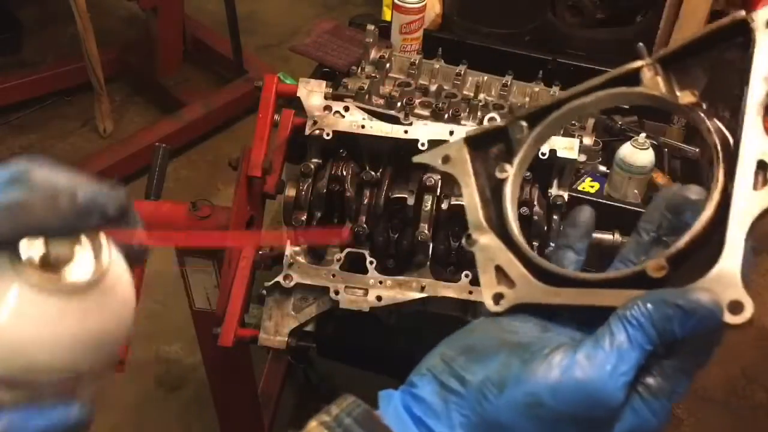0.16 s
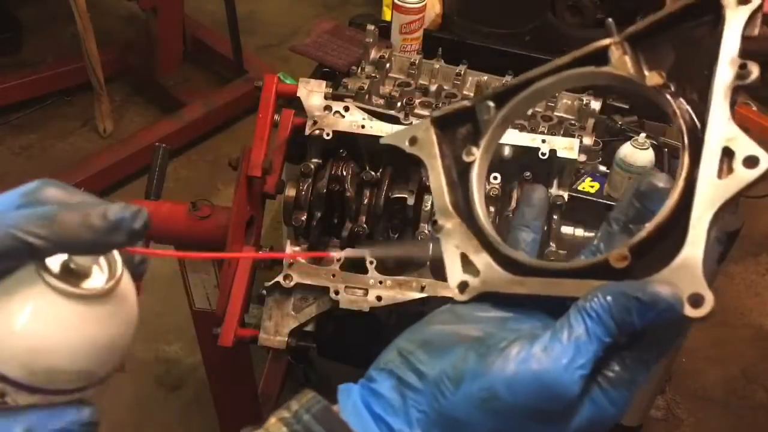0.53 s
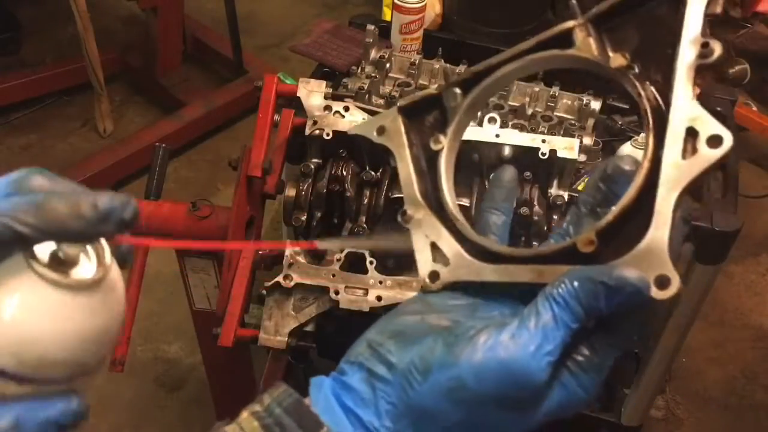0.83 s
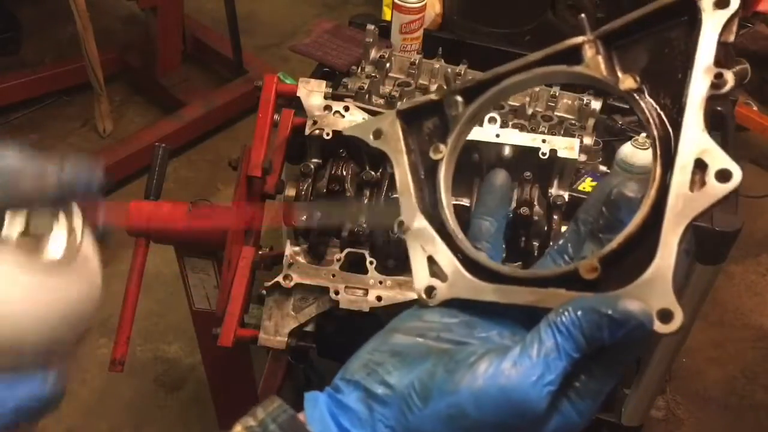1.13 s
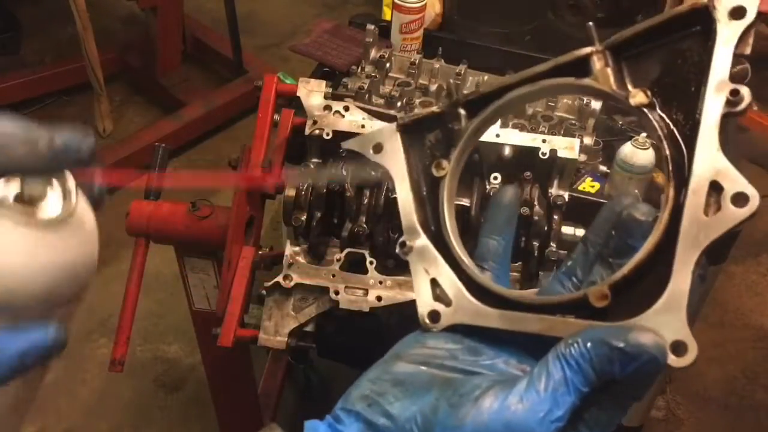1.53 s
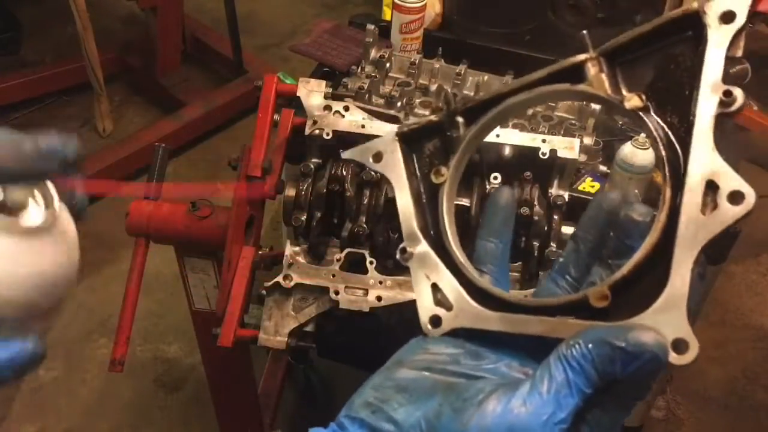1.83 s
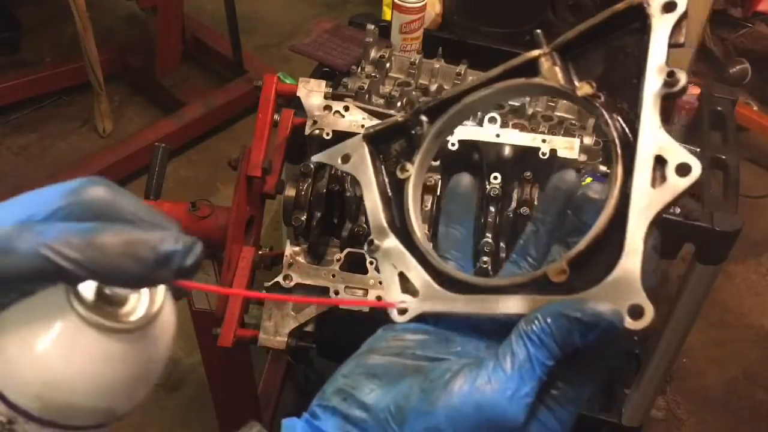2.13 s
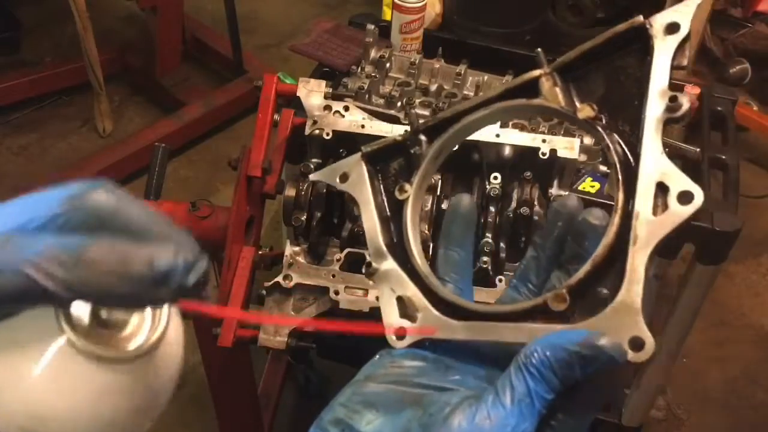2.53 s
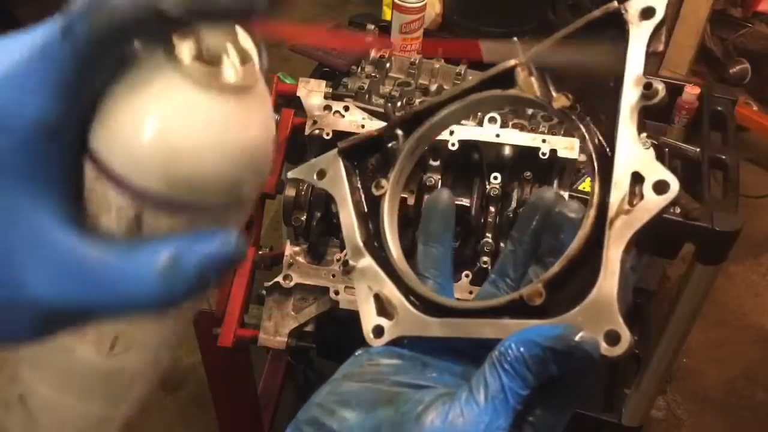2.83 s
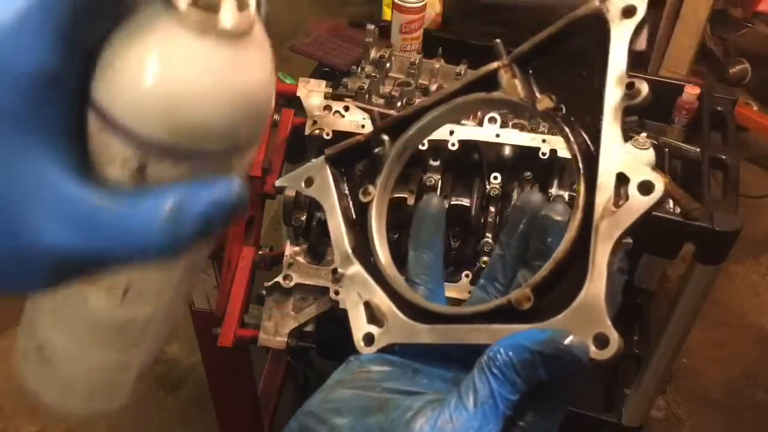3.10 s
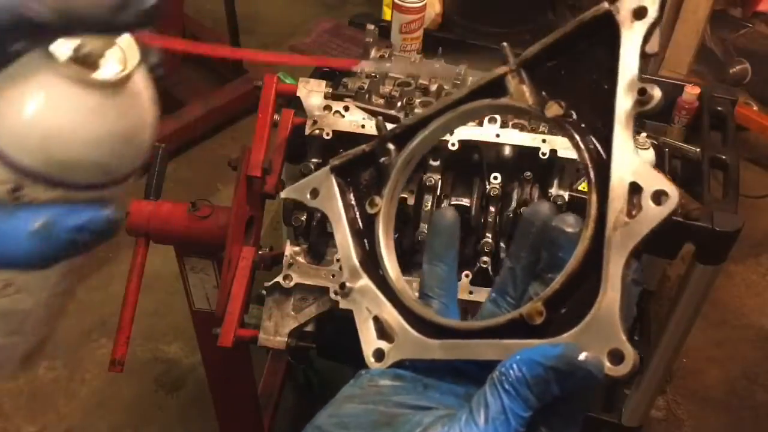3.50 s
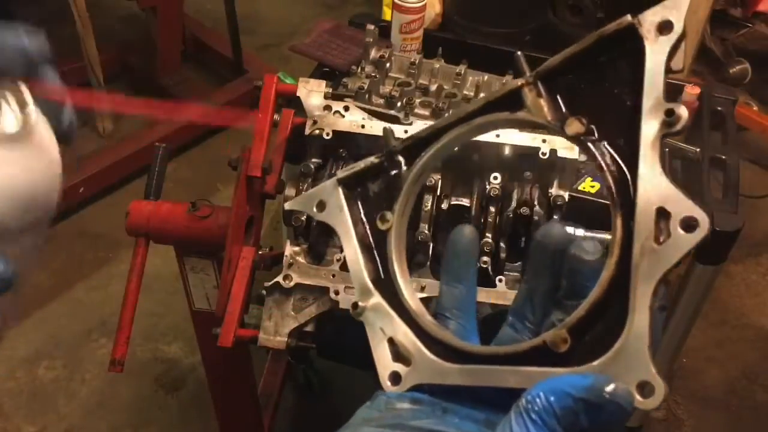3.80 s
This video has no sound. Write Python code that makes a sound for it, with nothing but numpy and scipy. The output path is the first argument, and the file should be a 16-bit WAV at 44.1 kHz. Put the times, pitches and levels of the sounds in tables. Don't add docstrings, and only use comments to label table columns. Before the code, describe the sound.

Aerosol spray, close and practically mono, over low workshop rumble. Bright whistling hisses with duller splashing on metal run at 0.2-0.5, 0.55-0.85, 0.95-1.2 and 1.2-1.65 seconds. A louder, more hollow-sounding sweep lasts 1.8-2.4, then the longest spray 2.5-3.65, starting with crackly spits. Each cuts off abruptly. Tiny ticks and glove rustles fill gaps; a soft low knock and rubbing follow from 3.8.

```python
import sys
import numpy as np
from scipy import signal
from scipy.fft import rfft, irfft
from scipy.io import wavfile
from scipy.ndimage import uniform_filter1d, map_coordinates

SR = 44100
rng = np.random.default_rng(int(sys.argv[2]) if len(sys.argv) > 2 else 0)


def nominal_scale(level):
    x = np.asarray(level, float) / 20
    return 10 ** x


def put_to_file(sound):
    columns = np.atleast_2d(sound).T
    safe = np.clip(columns, -1, 1)
    whole_steps = np.round(safe * 32767)
    wavfile.write(sys.argv[1], SR, whole_steps.astype(np.int16))


N = 174195
T_S = np.arange(N) / SR

# open t/s, shut t/s, first spit re full flow level/dB, rise t/s
PRESSES = [
    (0.183, 0.473, -12, 0.061),
    (0.556, 0.848, -10, 0.059),
    (.939, 1.193, -13.5, 0.074),
    (1.204, 1.671, -9.5, 0.12),
    (1.782, 2.408, -18, 0.076),
    (2.486, 3.667, -12, 0.038),
]
# t/s, level/dB, lower whistle f/Hz, upper whistle f/Hz, top air level/dB
JET_DABS = [
    [(0.25, -36, 9070, 13800, -1), (0.314, -32.5, 8200, 13400, -1), (0.4, -34, 8800, 13000, -1),
     (0.46, -36.5, 9300, 12800, -1)],
    [(0.61, -37.5, 9200, 12900, 0.5), (0.672, -32.5, 8700, 12700, .5), (.76, -36, 9400, 12600, .5),
     (0.84, -38.5, 10200, 12500, .5)],
    [(1.0, -34, 9500, 12500, 1.9), (1.11, -34.5, 9600, 12200, 2.7), (1.18, -37, 9800, 12200, 3.2)],
    [(1.26, -33, 9600, 12300, 4.4), (1.34, -34.5, 9650, 11900, 4.8), (1.44, -38.5, 9400, 11900, 6.8),
     (1.564, -31.5, 9500, 12500, 3.3), (1.66, -38.5, 9900, 12400, 4.5)],
]
JET_SWEEPS = [
    [(1.84, -30.5, 9000, 12600, -3), (1.892, -25, 9000, 12400, -1), (1.93, -25.5, 9100, 12400, -4),
     (2.024, -29.5, 8900, 13300, -1), (2.326, -29, 9100, 12600, 2), (2.375, -31, 9250, 12600, .6),
     (2.41, -36.5, 9600, 12400, -1)],
    [(2.54, -37, 9200, 13400, .6), (2.62, -31.5, 8640, 13300, .6), (3.048, -37, 9200, 14000, 1.5),
     (3.206, -35, 8600, 13600, 1.3), (3.44, -36.5, 9600, 13000, .6), (3.546, -36.5, 10000, 12300, 6.9),
     (3.66, -37, 9700, 12400, 4.3)],
]
# t/s, splash level/dB, hollow f/Hz, hollow peak level/dB
DAB_HITS = [
    [(0.25, -46.5, 1150, 2), (0.424, -40.5, 906, 0), (0.46, -47.5, 1270, 0)],
    [(0.61, -45, 1220, 1.5), (0.736, -41.5, 910, 0.5), (0.84, -47.5, 1060, -0.5)],
    [(1.0, -43.5, 824, 2), (1.12, -43, 1100, 1.5), (1.18, -43.5, 836, 3.5)],
    [(1.26, -40.5, 1100, 3), (1.592, -42.5, 1320, 2), (1.66, -46, 1180, 3.5)],
]
SWEEP_HITS = [
    [(1.84, -39.5, 1050, 5.4), (1.88, -39.5, 1880, 8), (1.98, -42, 2240, 10.6), (2.05, -43, 1900, 1.6),
     (2.31, -41, 1950, 5.9), (2.36, -36.5, 2250, 6.2), (2.405, -44, 1500, 1.3)],
    [(2.54, -47.5, 1450, 5.1), (2.64, -40, 2700, .3), (2.72, -42, 2800, .3), (2.9, -43, 2800, 0.28),
     (3.17, -44.5, 2820, .3), (3.22, -44, 1340, 0.41), (3.45, -42.5, 1340, 0.31), (3.56, -38.5, 1540, 7.1),
     (3.66, -43.5, 1640, 4.5)],
]
# f/Hz, level/dB per Hz
JET_SPECTRUM = [(1500, -61), (3000, -20), (5000, -6), (7000, -6.5), (10500, -6.5), (14000, -7.5),
                (15800, -7.5)]
# f/Hz, level/dB per Hz
SPLASH_SPECTRUM = [(120, -20.5), (250, -2), (600, -4), (1500, -5), (3500, -4), (7000, -16.5), (15000, -25)]
# f/Hz, width f/Hz, level/dB
FRAME_RINGS = [(585, 90, 4), (1100, 110, 3)]
# t/s, frame lag t/ms, signed frame share/1, block lag t/ms
ECHOES = [(.2, .385, -.3, .44), (1.68, .38, -.25, .41), (1.8, .44, .1, .45), (2.0, .44, .12, .46),
          (2.13, .43, .2, .56), (2.27, .45, .15, .45), (2.4, .45, .15, .44), (2.55, .43, -.3, .46),
          (2.66, .53, -.2, .47), (2.88, .53, -.15, .68), (3.15, .53, -.15, .64), (3.21, .425, -.45, .465),
          (3.45, .405, -.45, .425), (3.5, .315, -.3, .425), (3.67, .315, -.3, .41)]
# t/s, f/Hz, width f/Hz, level/dB
SLOT = [(.2, 2880, 380, 1), (.46, 3020, 378, -7), (.6, 3300, 450, -1), (.85, 3200, 450, -6),
        (.97, 2430, 250, -1.5), (1.4, 2320, 300, -4), (1.66, 2200, 300, 0.9), (1.8, 3430, 600, -0.5),
        (2.0, 3430, 600, 2), (2.3, 3340, 500, -1.5), (2.42, 3280, 500, -6), (2.5, 5000, 500, 0),
        (2.62, 5030, 500, -9), (2.63, 2800, 170, -9), (2.68, 2780, 170, 4.5), (2.8, 2740, 170, 4),
        (2.9, 2800, 150, -1.5), (3.17, 2840, 150, 5.5), (3.19, 2850, 150, -4), (3.2, 4600, 200, -7),
        (3.44, 4950, 200, 0), (3.46, 5300, 450, 1.5), (3.67, 5270, 450, 3)]
# t/s, peak level/dB, f/Hz
SPITS = [(0.1764, -47, 4280), (0.1845, -40, 4300), (0.1984, -32, 6660), (0.5646, -34, 6410),
         (0.9428, -39, 4200), (1.7918, -30.5, 6510), (2.4914, -33, 8780), (2.4962, -27, 8900),
         (2.5027, -29, 9000), (2.5064, -33, 8370), (2.5104, -30, 7080), (2.5207, -26, 9200)]
# t/s, peak level/dB, f/Hz, t60 t/s
TICKS = [(.013, -59, 2260, .03), (.128, -64.5, 13000, .01), (.137, -61, 12500, .012), (.488, -57, 950, .03),
         (.531, -58, 850, .04), (3.8, -52, 3120, .02), (.06, -61, 2180, .03), (.152, -63, 9000, .02),
         (.156, -53, 940, 0.026), (1.797, -39, 5430, .02), (2.434, -33, 6600, 0.0064),
         (2.44, -57, 1880, 0.28), (2.492, -42.5, 1800, 0.016), (3.8, -54, 5200, 0.027),
         (3.805, -52, 3960, 0.11), (3.87, -54, 2860, 0.04), (3.798, -42.5, 85.5, 0.057)]
# t/s, length t/s, level/dB, brightness dB/octave
RUSTLES = [
    (0, 0.031, -67, 6.5),
    (0.483, .07, -59, -5),
    (2.427, .06, -54, -2.5),
    (3.674, 0.11, -60, 0.5),
    (3.792, 0.0076, -53, .3),
    (3.811, 0.075, -58, -1),
    (3.882, .2, -53.5, -0.6),
]
# f/Hz, level/dB per Hz
GLOVE_SPECTRUM = [(300, -12), (600, 0), (1100, -5), (2000, 7.5), (4000, 3.5), (9000, 4.5), (12500, 1),
                  (15800, -8)]
# f/Hz, t60 t/s
ROOM_T60 = [(300, 0.55), (3000, 0.42), (12000, 0.15)]
# f/Hz, level/dB per Hz
SHOP_SPECTRUM = [(45, -1.5), (90, -7), (170, -20.5), (365, -24), (500, -37), (2200, -34), (3000, -38.5),
                 (15800, -38)]
# t/s, low edge f/Hz, high edge f/Hz, level/dB
STEREO_SLIPS = [
    (2.208, 5160, 8400, -40),
    (2.697, 8100, 9600, -44),
    (3.208, 9400, 12460, -47),
]


def jet():
    def colour(f_hz, t_s):
        level_db, low_hz, high_hz, air_db = curves(JET_DABS + JET_SWEEPS, t_s)
        air = nominal_scale(along(JET_SPECTRUM, f_hz) + air_db * np.clip((f_hz - 11000) / 4500, 0, 1))
        low = bump(f_hz, low_hz, 0.15 * low_hz, 6)
        high = bump(f_hz, high_hz, 0.074 * high_hz, 8 - 0.33 * (level_db + 33))
        return air * echoes(f_hz, t_s) * slot(f_hz, t_s) * straw_fill(f_hz, t_s) * low * high

    level_db = curves(JET_DABS + JET_SWEEPS, T_S)[0] + 1.14 * wobble(30.16)
    return nominal_scale(level_db) * shaped(droplets(1.1, 900), colour, patchy_db=1.1)


def straw_fill(f_hz, t_s):
    fill_s, dull_db = 0.095, -4
    since_open_s = [np.where(t_s < on_s - 0.02, 9, t_s - on_s) for on_s, *_ in PRESSES]
    filled = np.min(since_open_s, 0) / fill_s
    climb_hz = np.interp(filled, [0, 1], [4300, 15000])
    filling = np.clip(6 - 5 * filled, 0, 1)
    dulling = nominal_scale(dull_db * filling * np.clip((f_hz - climb_hz) / 3000, 0, 1))
    return bump(f_hz, climb_hz, 700, 7 * filling) * dulling


def splash():
    def colour(f_hz, t_s):
        _, hollow_hz, hollow_db = curves(DAB_HITS + SWEEP_HITS, t_s)
        hollow = bump(f_hz, hollow_hz, 0.16 * hollow_hz, hollow_db)
        bass_cut_db = 1.18 * hollow_db + 6.6 * np.log2(hollow_hz / 1100) * (t_s < 2.45)
        bass = nominal_scale(-bass_cut_db / (1 + (f_hz / 450) ** 4))
        frame = np.prod([bump(f_hz, *ring) for ring in FRAME_RINGS], 0)
        return nominal_scale(along(SPLASH_SPECTRUM, f_hz)) * hollow * bass * echoes(f_hz, t_s) * slot(f_hz, t_s) * frame

    level_db = curves(DAB_HITS + SWEEP_HITS, T_S)[0] + 1.13 + 0.65 * wobble(24.9)
    return nominal_scale(level_db) * shaped(droplets(0.73, 300), colour, patchy_db=1.2)


def valve_flow():
    open_s, shut_db_per_s, sputter_db = 0.006, 1086, 2.0
    gains_db = []
    for on_s, off_s, spit_db, rise_s in PRESSES:
        rise_db = spit_db * np.clip(1 - (T_S - on_s) / rise_s, 0, 1)
        crack_db = -14 * np.clip(1 - (T_S - on_s) / open_s, 0, 1)
        fall_db = -shut_db_per_s * np.clip(T_S - off_s, 0, 1)
        gains_db.append(np.where(T_S < on_s, -200, rise_db + crack_db + fall_db))
    gain_db = np.max(gains_db, 0)
    return nominal_scale(gain_db + sputter_db * np.clip(-gain_db / 12, 0, 1) * wobble(260))


def droplets(grain_db, rate_hz):
    return rng.standard_normal(N) * nominal_scale(grain_db * wobble(rate_hz))


def echoes(f_hz, t_s):
    frame_ms, share, block_ms = curves([ECHOES], t_s)
    dabbing = t_s < 1.75
    frame_gain = 0.75 * share * np.clip(f_hz / np.where(dabbing, 2400, 4000), 0, 1) / (1 + (f_hz / 8000) ** 4)
    frame = 1 + frame_gain * np.exp(-2j * np.pi * f_hz * frame_ms / 1000)
    sway = np.where(dabbing, 0.6, 1 + 0.35 * np.sin(19 * t_s + f_hz / 1900))
    block_gain = 0.28 * sway * np.clip(f_hz / 4000 - 1.25, 0, 1)
    jitter_ms = 0.012 * wobble(5)[np.minimum(t_s * SR, N - 1).astype(int)]
    block = 1 + block_gain * np.exp(-2j * np.pi * f_hz * (block_ms + jitter_ms) / 1000)
    return frame * block


def slot(f_hz, t_s):
    return bump(f_hz, *curves([SLOT], t_s))


def ticks():
    out, t_s = np.zeros(N + SR), T_S[:SR // 5]
    spits = [(start_s, db - 3.5, f_hz, 0.005) for start_s, db, f_hz in SPITS]
    for start_s, db, f_hz, t60_s in TICKS + spits:
        ring = nominal_scale(-60 * t_s / t60_s) * np.sin(2 * np.pi * f_hz * t_s)
        crack = 0.35 * nominal_scale(-60 * t_s / 0.006) * rng.standard_normal(len(t_s))
        out[round(start_s * SR):][:len(t_s)] += nominal_scale(db) * (ring + crack)
    return out[:N]


def gloves():
    strokes = np.zeros(N)
    for start_s, length_s, db, _ in RUSTLES:
        attack = np.clip((T_S - start_s) / 0.008, 0, 1)
        strokes += nominal_scale(db) * attack * nominal_scale(-300 * np.clip(T_S - start_s - length_s, 0, 9))
    starts_s, *_, tilt_db = np.transpose(RUSTLES)

    def colour(f_hz, t_s):
        stroke = np.searchsorted(starts_s, t_s + 0.01) - 1
        return nominal_scale(along(GLOVE_SPECTRUM, f_hz) + tilt_db[stroke] * np.log2((f_hz + 300) / 2500))

    return strokes * nominal_scale(0.8 * wobble(25)) * shaped(droplets(2.5, 400), colour, patchy_db=1.5)


def room(x):
    f_hz, t_s, z = signal.stft(rng.standard_normal(SR // 2), SR, nperseg=256)
    decay = nominal_scale(-60 * t_s / along(ROOM_T60, f_hz)[:, None])
    tail = signal.istft(z * decay, SR, nperseg=256)[1]
    return signal.fftconvolve(x, tail / np.linalg.norm(tail))[:N]


def shop():
    def colour(f_hz):
        return nominal_scale(along(SHOP_SPECTRUM, f_hz) - 100 * np.clip(44 / (f_hz + 1) - 1, 0, 3))

    return nominal_scale(-55 + 0.77 * wobble(12)) * unit(filtered(rng.standard_normal(N), colour))


def unit(x):
    return x / np.sqrt(np.mean(np.abs(x) ** 2) + 1e-20)


def along(points, f_hz):
    knots_hz, values = np.transpose(points)
    return np.interp(np.log(f_hz + 1), np.log(knots_hz + 1), values)


def curves(tables, t_s):
    knots_s, *columns = np.concatenate(tables).T
    return [np.interp(t_s, knots_s, column) for column in columns]


def wobble(rate_hz):
    return map_coordinates(rng.standard_normal(int(N * rate_hz / SR) + 4), [T_S * rate_hz])


def bump(f_hz, centre_hz, width_hz, db):
    return 1 + (nominal_scale(db) - 1) / (1 + ((f_hz - centre_hz) / width_hz) ** 2)


def shaped(x, gain, patchy_db):
    f_hz, t_s, z = signal.stft(x, SR, nperseg=512, noverlap=384)
    field = uniform_filter1d(rng.standard_normal(z.shape), size=7, axis=0)
    field = uniform_filter1d(field, size=30, axis=1)
    z = z * gain(f_hz[:, None], t_s) * nominal_scale(patchy_db * unit(field))
    return unit(signal.istft(z, nperseg=512, noverlap=384)[1][:N])


def filtered(x, gain):
    return irfft(rfft(x) * gain(np.fft.rfftfreq(N, 1 / SR)), N)


def scene():
    near = valve_flow() * (jet() + splash()) + ticks()
    return np.tile(near + nominal_scale(-19) * room(near) + gloves() + shop(), (2, 1))


def low_pass(x):
    return signal.sosfilt(signal.butter(12, 16370, fs=SR, output="sos"), x)


def record(dry):
    side = np.zeros(N)
    for start_s, low_hz, high_hz, db in STEREO_SLIPS:
        fade = np.cos(np.pi / 2 * np.clip((T_S - start_s) / 0.02, -1, 1))
        band = shaped(rng.standard_normal(N), lambda f_hz, t_s: (f_hz > low_hz) & (f_hz < high_hz), patchy_db=1.5)
        side += nominal_scale(db) * fade * band
    mono = filtered(dry, lambda f_hz: (f_hz < 15830) * bump(f_hz, 10500, 300, -2.0))
    return low_pass(mono + side * np.array([[1], [-1]]))


dry = scene()
out = record(dry)
put_to_file(out)
```